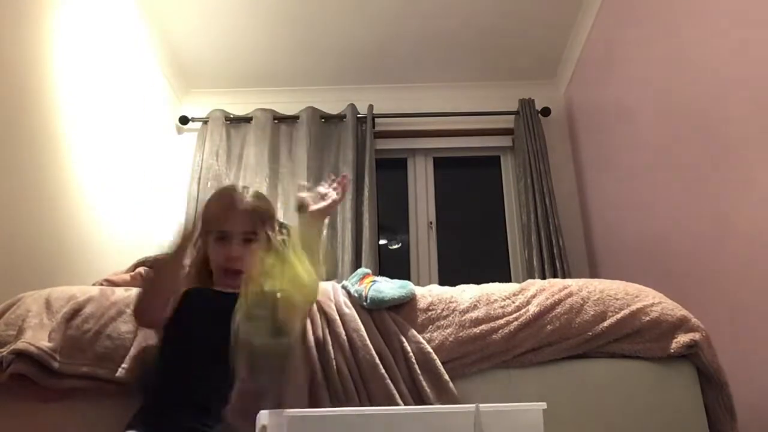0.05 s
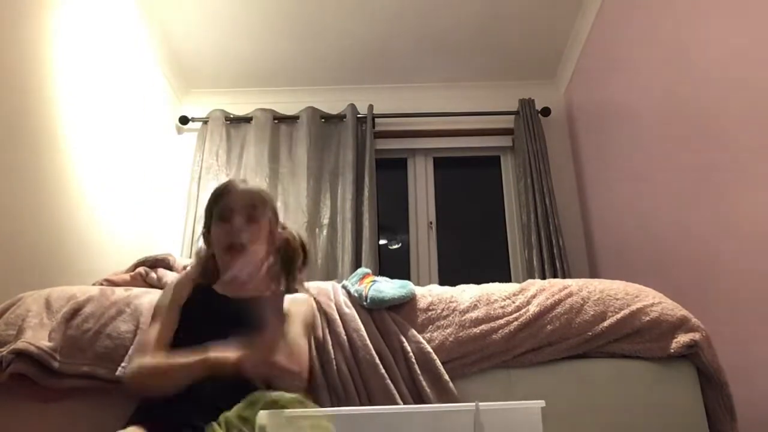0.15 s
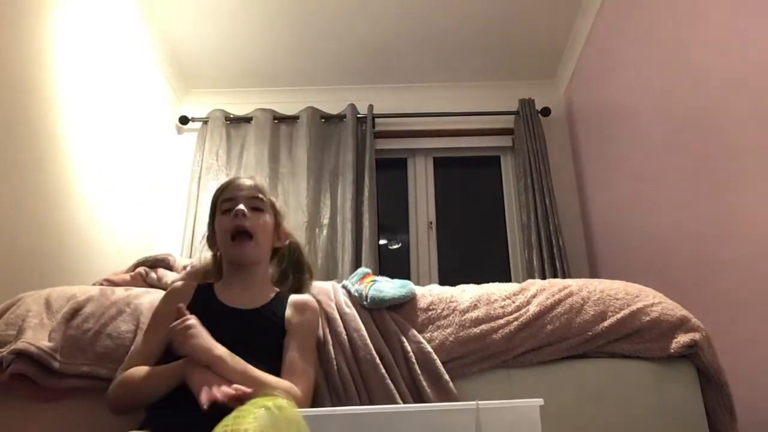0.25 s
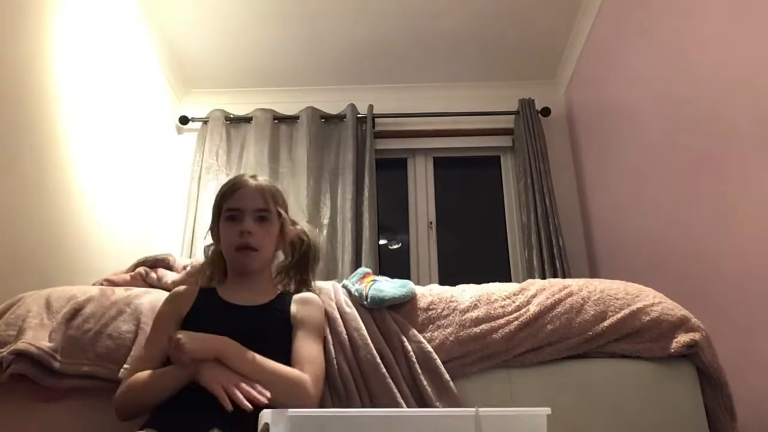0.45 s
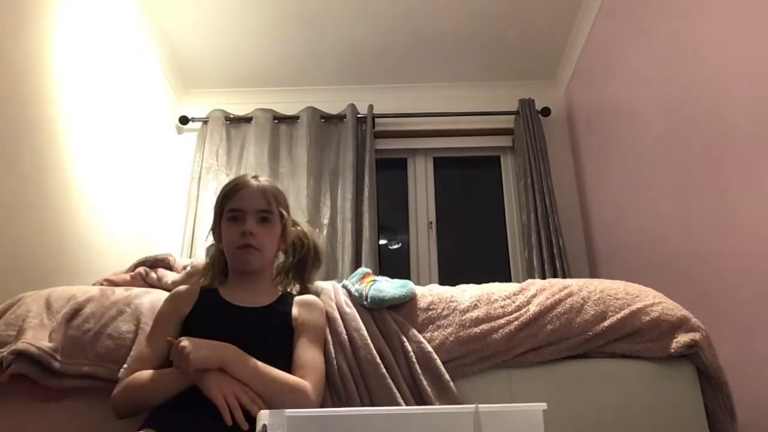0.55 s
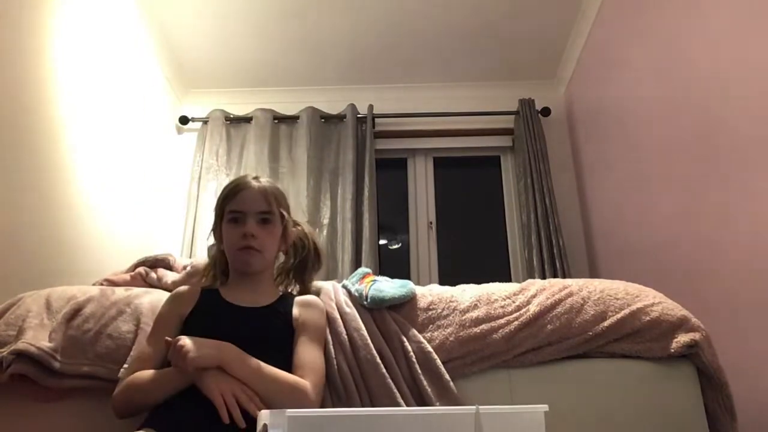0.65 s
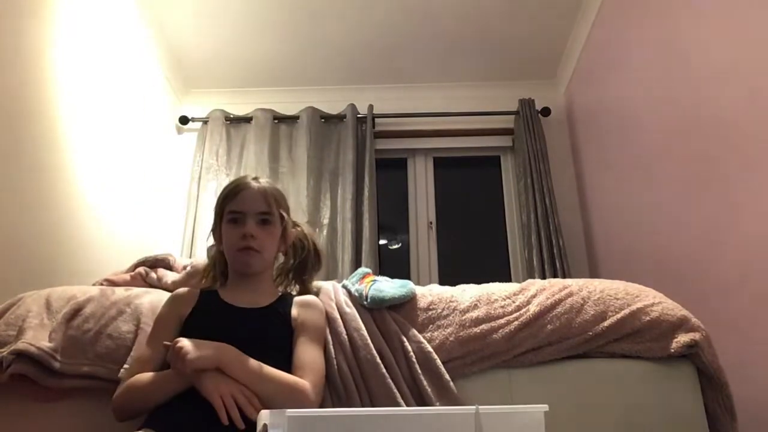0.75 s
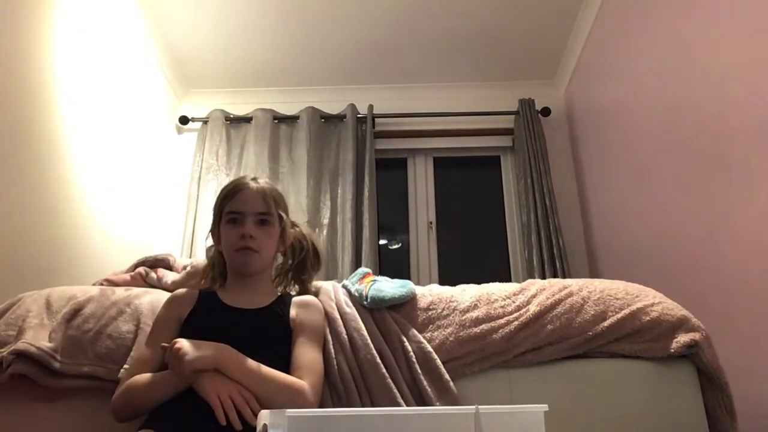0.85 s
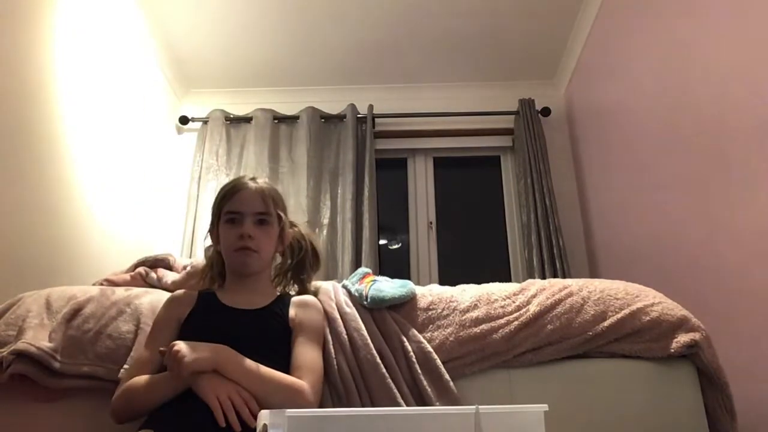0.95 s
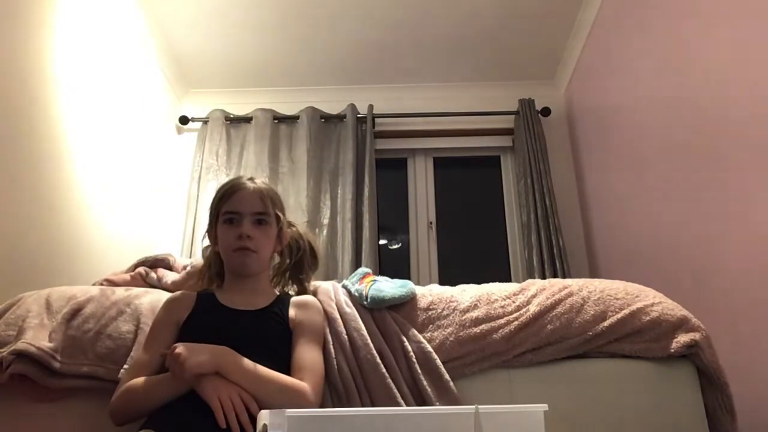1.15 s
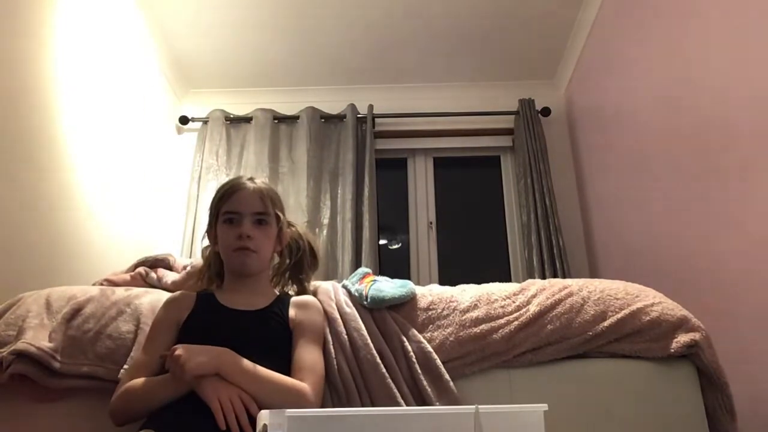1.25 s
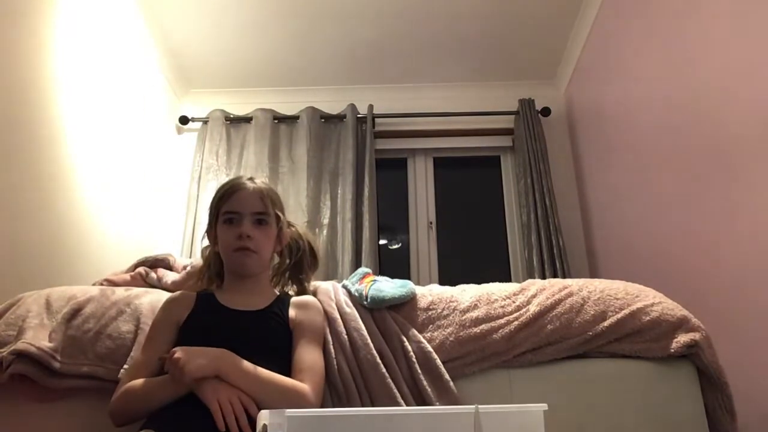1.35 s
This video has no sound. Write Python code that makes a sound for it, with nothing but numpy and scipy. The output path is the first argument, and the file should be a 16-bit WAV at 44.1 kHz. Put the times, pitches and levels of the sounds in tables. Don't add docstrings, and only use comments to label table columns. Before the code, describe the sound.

Light plastic coil rattle builds quickly to one sharp snap and hollow box knocks, then low thumps and faint ticks fade into soft room rumble; carpeted bedroom, short reverberation, ordinary microphone with little deep bass.

```python
import sys
import numpy as np
from scipy import signal
from scipy.fft import rfft, irfft, next_fast_len
from scipy.io import wavfile

SR = 44100
rng = np.random.default_rng(int(sys.argv[2]) if len(sys.argv) > 2 else 0)


def volts_from_decibels(level):
    exponent = np.asarray(level, float) / 20
    return 10 ** exponent


def store_pcm(level_fs):
    pcm = np.round(np.clip(level_fs, -1, 1) * 32767).astype(np.int16)
    wavfile.write(sys.argv[1], SR, np.atleast_2d(pcm).T)


N = 61739

# pitch_hz [Hz], level_db [dB], t60_s [s to fall by 60 dB]
BOX_TONES = [(240.3, 5, 0.043), (303, -2.5, .07), (370.5, -1, 0.08), (469.3, 0, 0.085), (621, -4, 0.091),
             (685.2, -4, .06), (810, -4.5, 0.041), (912.4, -6, .06), (1250, -2.5, 0.055), (1500, -6, 0.029),
             (1777, -8.5, 0.07), (1979.4, -8, 0.1), (2920, -2.5, .05), (2987, -9, .05)]


def rms_one(x):
    return x / np.sqrt(np.mean(x ** 2) + 1e-20)


def at_hz(points, hz):
    table = np.array(points)
    return np.interp(np.log(hz), np.log(table[:, 0]), table[:, 1])


def coloured(x, gain):
    hz = np.maximum(np.fft.rfftfreq(len(x), 1 / SR), 10)
    return irfft(rfft(x) * gain(hz), len(x))


def ring(clicks, hz, t60):
    r = volts_from_decibels(-60 / (t60 * SR))
    w = 2 * np.pi * hz / SR
    return signal.lfilter([0, np.sin(w)], [1, -2 * r * np.cos(w), r * r], clicks + 1e-18)


def click_at(s):
    return 1. * (np.arange(N) == int(s * SR))


def wire(hz):
    # pitch_hz [Hz], width_hz [Hz], level_db [dB]
    wire_tones = [(6760, 400, 0.5), (3250, 250, 0.5), (4500, 500, -0.5), (1907, 120, 3), (2878, 220, 4.5),
                  (2426, 260, -0.5)]
    lines = []
    for mid_hz, width_hz, db in wire_tones:
        lines.append(volts_from_decibels(db) / (1 + (2 * (hz - mid_hz) / width_hz) ** 2))
    return (1 + sum(lines[:-1])) / (1 + lines[-1])


def patches():
    spread_db, patches_per_s = 3.0, 60
    knots = rng.standard_normal(200)
    wander = np.interp(np.arange(N) / SR * patches_per_s, np.arange(len(knots)), knots)
    return volts_from_decibels(spread_db * wander)


def rattle():
    # start_s [s], level_db [dB], brightness_db [dB], drag_db [dB]
    jostle = [(0, -51.5, 4.5, -65.5), (.05, -50, -2, -59), (.085, -51.5, -0.5, -49), (.145, -54, 1.5, -53),
              (0.16, -45, 9, -44), (.26, -41, 3.5, -55), (.30, -40, 3, -48), (.34, -29.5, -10.5, -24.5),
              (.385, -35, -6, -24.5), (0.429, -43.5, -2, -42), (.465, -49.5, 3, -66),
              (0.531, -55.5, 4, -54), (.66, -57, -4.5, -55.5), (.76, -61, -3.5, -52.5), (.83, -68, -9, -63),
              (0.921, -72, -10.5, -67.5), (1.029, -80.5, -7.5, -71.5), (1.4, -90, -4, -102.5)]
    # pitch_hz [Hz], level_db [dB per Hz]
    coil_colour = [(600, -38.5), (950, -13.5), (1400, -14), (2600, -14), (3300, -10.5), (6000, -9),
                   (9000, -8), (16500, -9.5)]
    # pitch_hz [Hz], level_db [dB per Hz]
    drag_colour = [(40, -19.5), (90, 0.5), (200, 2.5), (500, 0.5), (750, -5.5), (1000, -16), (2000, -25.5),
                   (4000, -31)]
    touches_per_s, touch_spread_db, touch_cycles = 5000, -0.5, 4.3
    pings_per_s, ping_hz, ping_t60_s, ping_share = 250, 6850, 0.045, 0.31
    sheen_share, hollow_share, bright_from_hz = 0.6, 0.91, 8000

    s, *columns = np.transpose(jostle)
    level, bright, drag = [volts_from_decibels(np.interp(np.arange(N) / SR, s, column)) for column in columns]
    sizes = volts_from_decibels(touch_spread_db * np.minimum(rng.exponential(1, N), 5)) * rng.choice([-1, 1], N)
    touches = sizes * (rng.random(N) < touches_per_s / SR)

    dealt = rng.integers(0, 20, N)
    grains = np.zeros(N)
    for k, hz in enumerate(np.geomspace(900, 17000, 20)):
        grains += ring(touches * (dealt == k), hz, touch_cycles / hz) * hz * patches()

    mix = rms_one(grains) + sheen_share * rng.standard_normal(N)

    def coil_gain(hz):
        return volts_from_decibels(at_hz(coil_colour, hz)) * wire(hz) * hz ** 4 / (hz ** 4 + 700. ** 4)

    mix = rms_one(coloured(mix, coil_gain))
    ping_clicks = sizes * (rng.random(N) < pings_per_s / SR)
    low_ping = ring(ping_clicks, ping_hz * .97, ping_t60_s)
    high_ping = ring(ping_clicks, ping_hz * 1.03, ping_t60_s)
    mix = mix + ping_share * rms_one(low_ping - high_ping)
    dull = coloured(mix, lambda hz: 1 / (1 + (hz / bright_from_hz) ** 4))

    scuff = rms_one(coloured(touches, lambda hz: volts_from_decibels(at_hz(drag_colour, hz))))
    hollow = rms_one(sum(ring(scuff, hz, t60) * hz for hz, _, t60 in BOX_TONES))
    scuff = rms_one(scuff + hollow_share * hollow)
    return level * (dull + bright * (mix - dull)) + drag * scuff


def claps():
    # start_s [s], level_db [dB], length_s [s], centre_hz [Hz]
    clap_events = [(0.02, -36, 0.015, 8200), (.045, -47, 0.0045, 7100), (0.069, -42.5, 0.0091, 8100),
                   (0.156, -43, .012, 5040), (0.2012, -29.5, .006, 5000), (0.215, -33, 0.0067, 6093),
                   (0.281, -30.5, .015, 11000), (0.3052, -22.5, 0.0036, 4980), (0.317, -28, 0.0043, 4500),
                   (.325, -30, 0.005, 8000), (0.334, -30, 0.011, 4500), (0.347, -27, 0.021, 2478),
                   (0.374, -29, 0.015, 3504), (0.396, -28.5, 0.0042, 3470), (0.442, -42.5, 0.01, 9400),
                   (0.519, -44, 0.0077, 10000), (0.573, -51, 0.011, 9000), (0.606, -50.5, 0.011, 10000),
                   (0.649, -50.5, 0.0095, 12100), (.696, -55.5, 0.022, 2510), (0.945, -59, .006, 13060),
                   (0.958, -57, 0.0099, 11000), (0.969, -62.5, 0.026, 5020), (1.366, -69, 0.025, 6060),
                   (1.392, -64, 0.011, 6100)]
    octaves, rise_share, spread_db = 1, 0.25, 2.5
    out = np.zeros(N + SR)
    t = np.arange(4410) / SR
    for s, db, length, centre_hz in clap_events:
        volley = rng.standard_normal(len(t)) * volts_from_decibels(spread_db * rng.standard_normal(len(t)))

        def clap_gain(hz):
            return wire(hz) * np.exp(-(np.log2(hz / centre_hz) / octaves) ** 2)

        swell = np.exp(-t / length) * (1 - np.exp(-t / (rise_share * length)))
        out[int(s * SR):][:len(t)] += volts_from_decibels(db) * rms_one(coloured(volley, clap_gain)) * swell
    return out[:N]


def snap():
    # pitch_hz [Hz], level_db [dB], t60_s
    # [s]
    snap_tones = [(2750, -30, 0.024), (6600, -17.5, 0.012), (7900, -18.5, .008), (10260, -20.5, 0.005)]
    low_snap_tones = [(3736, -24, 0.035), (4116, -22, 0.034), (4640, -25, 0.037)]
    sing_tones = [(1960, -65, 0.61), (2830, -62, 0.31), (3190, -65.5, 0.56), (980, -58, 0.31)]
    snap_s, low_snap_s, landing_s = .3057, .308, .698
    out = np.zeros(N)
    for s, tones in ((snap_s, snap_tones), (low_snap_s, low_snap_tones)):
        for hz, db, t60 in tones:
            out += volts_from_decibels(db) * ring(click_at(s), hz, t60)
    for hz, db, t60 in sing_tones:
        tremble = rms_one(coloured(rng.standard_normal(N), lambda f: 1 / (1 + (f / 45) ** 2)))
        out += volts_from_decibels(db) * ring(click_at(landing_s), hz, t60) * tremble
    return out


def box():
    # start_s [s], level_db [dB], favoured_hz [Hz]
    knocks = [(.060, -55, 600), (.078, -49, 600), (.098, -53.5, 550), (.135, -35, 350), (.196, -35, 810),
              (0.2, -40.5, 1500), (.2035, -27.5, 480), (.212, -33, 270), (.244, -42, 680), (.294, -38, 380),
              (.3075, -28.5, 1400), (.308, -20.5, 520), (.318, -25.5, 260), (.336, -26, 900),
              (.339, -25, 380), (.347, -25.5, 1900), (.349, -14.5, 468), (.353, -18, 640),
              (.356, -26.5, 1250), (.361, -21.5, 320), (.376, -21, 480), (.378, -28, 1250),
              (.388, -32, 560), (0.396, -36.5, 1750), (.408, -30, 280), (.430, -45.5, 330),
              (.460, -46.5, 930), (0.699, -44.5, 325), (.708, -43.5, 550), (1.327, -62, 550)]
    spread_db, octaves = 1.0, .6
    contact_cycles, contact_gain = 2.13, 10.94
    s, db, near_hz = np.transpose(knocks)
    out = np.zeros(N)
    for k, (hz, tone_db, t60) in enumerate(BOX_TONES):
        luck_db = spread_db * rng.standard_normal(len(s))
        favour = np.exp(-(np.log2(hz / near_hz) / octaves) ** 2)
        clicks = np.zeros(N)
        clicks[(s * SR).astype(int)] = volts_from_decibels(db + tone_db + luck_db) * favour
        contact = ring(clicks, hz, contact_cycles / hz) * contact_gain * hz / SR
        out += ring(contact, hz, t60) * (-1) ** k
    return out


def thumps():
    # start_s [s], level_db [dB], first_hz [Hz], last_hz [Hz], t60_s [s]
    thump_events = [(.137, -28.5, 296, 123.3, .09), (.170, -32.5, 144, 110, 0.13),
                    (0.211, -30, 246, 122, 0.14), (.258, -28.5, 151.2, 122.5, .1),
                    (0.294, -26, 158.2, 135, 0.08), (.358, -20, 200, 119, 0.11),
                    (0.37, -32.5, 99.9, 75.7, 0.25), (0.448, -35.5, 150, 91, 0.04),
                    (.521, -37.5, 220, 136, 0.15), (0.601, -31.5, 125, 119, 0.089),
                    (0.654, -43, 120, 111, .12), (0.7, -27.5, 268, 103, 0.14),
                    (.775, -41.5, 141, 130, 0.074), (.970, -50.5, 180.6, 100.2, 0.074),
                    (1.189, -53.5, 128.4, 98.9, 0.13), (.150, -36.5, 74, 69.5, 0.1),
                    (0.253, -33, 71.95, 69, .2), (.720, -42, 80, 70, .2)]
    rise_s, glide_s, roughness = .015, .007, .2
    out = np.zeros(N + SR)
    t = np.arange(SR // 2) / SR
    rise = np.sin(np.pi / 2 * np.minimum(t / rise_s, 1)) ** 2
    for s, db, first_hz, last_hz, t60 in thump_events:
        turns = last_hz * t + (first_hz - last_hz) * glide_s * (1 - np.exp(-t / glide_s))
        fall = volts_from_decibels(-60 * np.maximum(t - rise_s, 0) / t60)
        out[int(s * SR):][:len(t)] += volts_from_decibels(db) * rise * fall * np.sin(2 * np.pi * turns)
    buzz = rms_one(coloured(rng.standard_normal(N), lambda hz: 1 / (1 + (hz / 200) ** 4)))
    return out[:N] * (1 + roughness * buzz)


def bedroom(x):
    room_t60_s, wall_cut_hz = 0.27, 4400
    size = next_fast_len(N + SR)
    hz = np.fft.rfftfreq(size, 1 / SR)
    echo = 0
    for k, lag in enumerate(rng.uniform(.011, .034, 10)):
        dulling = np.sqrt(1 + (hz / wall_cut_hz) ** 2 * lag / 0.016)
        loop = volts_from_decibels(-60 * lag / room_t60_s) / dulling * np.exp(-2j * np.pi * hz * lag)
        echo = echo + loop / (1 - loop) * (-1) ** k
    return irfft(rfft(x, size) * echo, size)[:N]


def house_quiet():
    # pitch_hz [Hz], level_db [dB per Hz]
    quiet_colour = [(24, -43.5), (40, -11), (107, -5), (164, -18), (300, -19), (624, -25), (910, -37),
                    (7180, -45), (16500, -57.5)]
    noise = coloured(rng.standard_normal(N), lambda hz: volts_from_decibels(at_hz(quiet_colour, hz)))
    return volts_from_decibels(-62.5) * rms_one(noise)


def scene():
    toy = rattle() + claps() + box() + thumps() + snap()
    room_db = -19
    return (toy + volts_from_decibels(room_db) * bedroom(toy) + house_quiet())[None]


def band_limit(x):
    return signal.sosfilt(signal.butter(12, 16750, fs=SR, output="sos"), x)


def record(dry):
    low_cut = signal.butter(4, 57.4, "high", fs=SR, output="sos")
    top_cut = signal.cheby2(20, 60, 16450, fs=SR, output="sos")
    x = signal.sosfilt(low_cut, dry)
    x = 0.69 * np.tanh(x / .7)
    return band_limit(signal.sosfilt(top_cut, x))


dry = scene()
out = record(dry)
store_pcm(out)
```